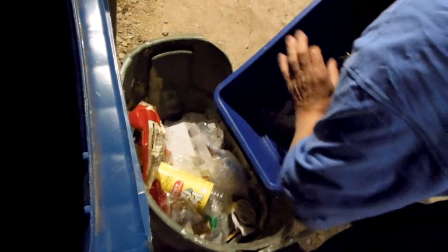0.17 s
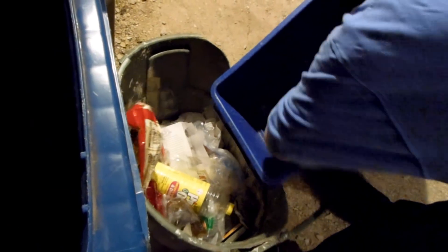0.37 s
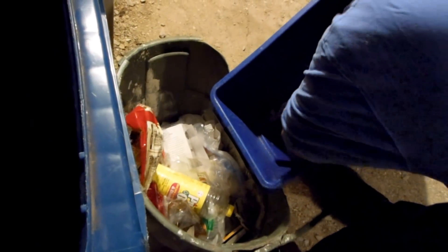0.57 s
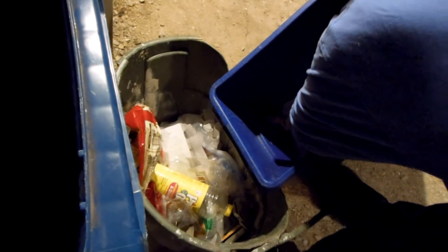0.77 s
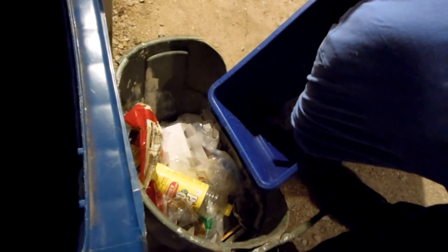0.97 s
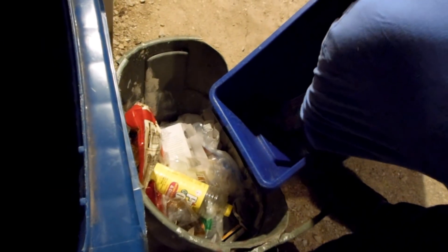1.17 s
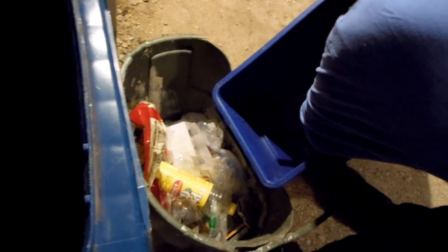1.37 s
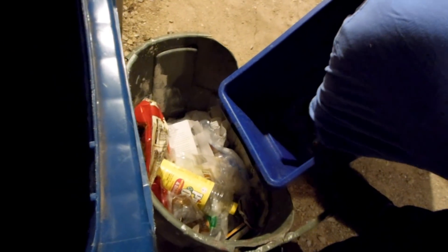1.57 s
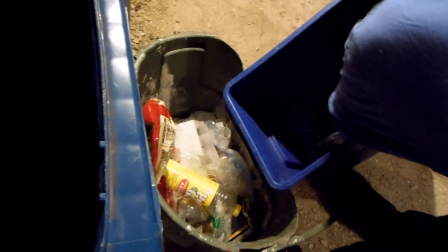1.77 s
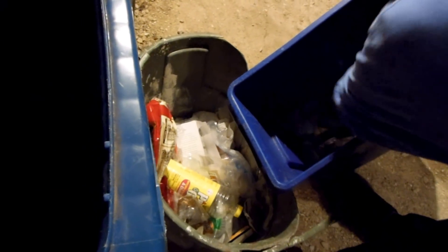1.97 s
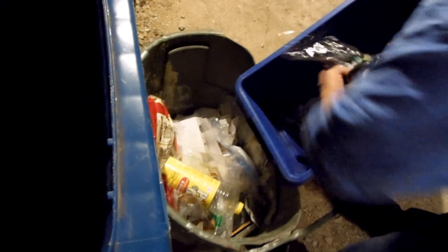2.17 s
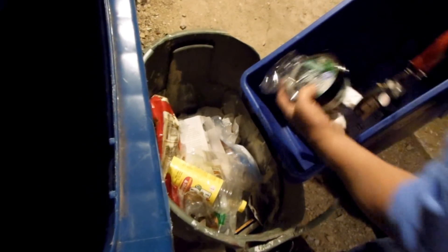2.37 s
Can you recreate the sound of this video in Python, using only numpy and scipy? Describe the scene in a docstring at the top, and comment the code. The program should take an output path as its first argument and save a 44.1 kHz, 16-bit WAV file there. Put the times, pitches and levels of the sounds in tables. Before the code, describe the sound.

Close, booming knocks of a plastic bin on a garbage can, fading into taps and crinkling wrappers.

```python
"""A booming knock, close enough to overload the recorder: outdoors at night, a hollow plastic bin hits a
garbage can while bottles and wrappers slide about in it. Each knock booms in the tub, rings its walls and
cracks; a small metal clasp tinkles. Then foil wrappers rustle and snap near the stereo microphone,
over a distant rumble."""
import sys
import numpy as np
from scipy import signal
from scipy.fft import rfft, irfft, next_fast_len
from scipy.io import wavfile

SR = 44100
rng = np.random.default_rng(int(sys.argv[2]) if len(sys.argv) > 2 else 0)


def waveform_to_disk(signal):
    """Save audio, clipped to [-1, 1], as 16-bit WAV at the path in sys.argv[1]."""
    frames = np.transpose(np.atleast_2d(signal))
    scaled = np.clip(frames, -1, 1) * 32767
    samples = np.round(scaled).astype(np.int16)
    wavfile.write(sys.argv[1], SR, samples)


N = 106854


def from_db(db):
    return 10 ** (np.asarray(db) / 20)


def unit_rms(x):
    return x / np.sqrt(np.mean(x ** 2) + 1e-20)


def at_hz(points, hz):
    point_hz, values = np.transpose(points)
    return np.interp(np.log(hz), np.log(point_hz), values)


def decay(t60, size):
    """Exponential fall from 1, by 60 dB in t60 seconds."""
    return from_db(-60 * np.arange(size) / SR / np.maximum(t60, .003))


def band(x, low_hz, high_hz):
    sos = signal.butter(2, [low_hz, min(high_hz, .45 * SR)], "band", fs=SR, output="sos")
    return signal.sosfilt(sos, x)


def add(out, start_s, sound):
    i = int(start_s * SR)
    out[i:i + len(sound)] += sound[:N - i]


def drift(rate_hz):
    """Smooth random wander of rms 1."""
    step, settle = 40, 2000
    pole = np.exp(-2 * np.pi * step * rate_hz / SR)
    white = rng.standard_normal(N // step + settle + 2)
    slow = signal.lfilter([1], [1, -2 * pole, pole ** 2], white)[settle:]
    return np.interp(np.arange(N) / step, np.arange(len(slow)), unit_rms(slow))


# Diffuse sound at the microphone. Each row: frequency in Hz, left-right correlation.
LIKENESS = [(60, 0.98), (240, 0.97), (920, 0.93), (3620, 0.79), (14200, 0.64)]
def diffuse_noise(spectrum, white, flicker_db):
    """Stereo noise of rms 1 in half-octave bands that flicker partly together, partly alone."""
    out, together = 0, drift(rate_hz=20)
    edges_hz = 20 * 2 ** np.arange(0, 9.6, .5)
    for k, (low, high) in enumerate(zip(edges_hz, edges_hz[1:])):
        centre_hz = np.sqrt(low * high)
        mid, side = band(white[k % 2], low, high)
        alike = at_hz(LIKENESS, centre_hz)
        gain = from_db(at_hz(spectrum, centre_hz) + flicker_db * (together + drift(rate_hz=20)))
        out += gain * (np.sqrt(1 + alike) * mid + np.sqrt(1 - alike) * side * [[1], [-1]])
    return unit_rms(out)


# The night air, far off. Each row: frequency in Hz, relative density in dB.
RUMBLE_SPECTRUM = [(13, -32), (22, -2.5), (81, 2.5), (143, -18), (183, -6.5), (448, -22.5), (621, -15.5),
                   (837, -18.5), (1100, -21), (2000, -25), (14500, -44)]
def distant_rumble():
    """A low, faintly wavering bed of outdoor noise."""
    white = rng.standard_normal((2, 2, N))
    return from_db(-41) * diffuse_noise(RUMBLE_SPECTRUM, white, flicker_db=-.7)


# Wrappers and a sleeve, near the microphone. Each row: time in seconds, level in dB.
RUSTLE_LEVELS = [(0, -44), (.15, -54), (.7, -59), (.77, -51), (.88, -57), (1.1, -57), (1.21, -49),
                 (1.4, -56), (1.56, -55), (1.66, -49), (1.81, -50), (1.88, -45), (1.96, -49), (2.1, -47),
                 (2.17, -41.5), (2.22, -45), (2.26, -40), (2.31, -41), (2.345, -58), (2.42, -55)]
# Their tone colour. Each row: frequency in Hz, relative density in dB.
RUSTLE_SPECTRUM = [(1500, -2.5), (2100, -5), (3400, -2.5), (5400, -7), (7100, 3.5), (9500, -3), (12300, 0),
                   (14500, .5)]
def wrapper_rustle(crinkles_per_s=3000, spread_db=3):
    """Dense crinkles of uneven size on smooth rubbing noise, at equal power."""
    shape = (2, 2, N)
    happens = rng.random(shape) < crinkles_per_s / SR
    sizes = from_db(spread_db * np.minimum(rng.exponential(1, shape), 3))
    crinkles = unit_rms(happens * sizes * rng.choice([-1, 1], shape))
    white = np.sqrt(.5) * (crinkles + rng.standard_normal(shape))
    level_db = np.interp(np.arange(N) / SR, *np.transpose(RUSTLE_LEVELS))
    return from_db(level_db) * diffuse_noise([(700, -30)] + RUSTLE_SPECTRUM, white, flicker_db=.9)


# Wrappers snap and small bottles tap, close by.
# Each row: start in seconds, peak in dB, centre in Hz, width in octaves, t60 in seconds.
SNAPS_AND_TAPS = [(0.9672, -23, 6500, 1.4, 0.034), (0.9705, -10.5, 7100, 1.4, 0.013),
                  (0.9713, -9.5, 2740, 1.1, 0.009), (1.145, -16.5, 5680, 0.33, 0.015),
                  (1.145, -13.5, 9000, 4.5, 0.0072), (1.288, -31.5, 5100, 1.8, 0.04),
                  (1.583, -32.5, 1250, 1.26, .03), (1.625, -31, 4100, 0.76, 0.064),
                  (1.647, -21, 10500, 1.7, 0.043), (1.731, -29.5, 1520, 0.24, 0.031),
                  (1.901, -30.5, 420, 1.75, 0.21), (1.9063, -17.5, 4470, 3.1, 0.032),
                  (2.398, -24.5, 4800, 1.6, 0.046), (2.398, -38.5, 800, 0.23, 0.028)]
def snaps_and_taps(click_strength=.5):
    """A sharp click and a dying noise burst pass through one resonance."""
    out, size = np.zeros(N), SR // 8
    for start_s, peak_db, hz, octaves, t60 in SNAPS_AND_TAPS:
        burst = rng.standard_normal(size) * decay(t60, size)
        burst[0] += click_strength * np.sqrt(SR / hz / octaves)
        snap = band(burst, hz / 2 ** (octaves / 2), hz * 2 ** (octaves / 2))
        add(out, start_s, from_db(peak_db) * snap / np.max(np.abs(snap)))
    return out


# The metal clasp. Each row: pitch in Hz, level in dB, t60 in seconds, family (0 lower, 1 upper).
CLASP_MODES = [(4850, 0, .13, 0), (4890, -6, .1, 0), (5900, -3, .05, 0), (9530, -12, .1, 0),
               (7195, 1, .14, 1), (7250, -5, .09, 1), (10730, -8, .08, 1)]
# Its tinkles, close by. Each row: start in seconds, levels of the lower and upper family in dB.
CLASP_TINKLES = [(.008, -36, -39), (.135, -49, -61), (.293, -55, -26), (.452, -24, -52), (.559, -58, -29.5),
                 (.622, -71, -49)]
def clasp(rattle_db=2.5, rattle_hz=120):
    """Thin metal modes, close pairs beating, their level shaken as the loose parts rattle."""
    out, size = np.zeros(N), SR // 2
    t = np.arange(size) / SR
    for start_s, *family_db in CLASP_TINKLES:
        for hz, db, t60, family in CLASP_MODES:
            ring = np.sin(2 * np.pi * hz * t) * decay(t60, size)
            add(out, start_s, from_db(db + family_db[int(family)]) * ring)
    return out * from_db(rattle_db * drift(rattle_hz))


# The contact on the bin, heard close. Each row: low and high edge in Hz, level in dB,
# t60 in seconds, relative level of a slower tail in dB, its t60 in seconds.
CONTACT_BANDS = [(104.5, 690, -6, 0.17, -8.5, 0.26), (580, 2250, -4.5, 0.047, -8.5, 0.15),
                 (2400, 7200, -1, 0.014, -3, 0.11), (10500, 14200, -4, 0.037, -15.5, 0.13)]
def contact_noises(skirt=1.6):
    """Steady noise for each band, falling twice as steeply a factor of skirt beyond its edges."""
    return [unit_rms(band(band(rng.standard_normal(N + SR // 2), low, high), low / skirt, high * skirt))
            for low, high, *_ in CONTACT_BANDS]


def contact(t, noises, levels_db, stretches, rise_cycles=.23):
    """The crack of a blow: each noise band jumps up, drops fast and leaves a tail."""
    out = 0
    for row, noise, level_db, stretch in zip(CONTACT_BANDS, noises, levels_db, stretches):
        low_hz, _, band_db, t60, tail_db, tail_t60 = row
        rise = (1 - np.exp(-t * low_hz / rise_cycles)) ** 2
        fall = decay(t60 * stretch, len(t)) + from_db(tail_db) * decay(tail_t60 * stretch, len(t))
        out += from_db(level_db + band_db) * noise[:len(t)] * rise * fall
    return out


# The bin's plastic walls. Each row: pitch in Hz, level in dB, t60 in seconds.
WALL_MODES = [(100.3, -6.5, 0.11), (147.9, -13, 0.37), (191.2, -22, 0.38), (244, -12, 0.16),
              (262, -12, 0.23), (341, -15, 0.21), (398, -10.5, 0.12), (441.7, -12.5, .11), (568.4, -6, 0.1),
              (663, -9, 0.13), (776, -13, 0.18), (947, -19.5, 0.15), (1134, -15, 0.12),
              (1400, -17.5, 0.052)]
def wall_ring(t, ring_db, clatter_db, stretch, spot_hz, luck, spread_db=3.5, detune=.014):
    """The walls ring; modes near the struck spot's own pitch sound louder and longer."""
    hz, mode_db, t60 = np.transpose(WALL_MODES)[:, :, None]
    level_luck, pitch_luck = luck
    octaves_below = np.log2(spot_hz / hz)
    near = np.exp(-(octaves_below / .13) ** 2)
    blow_db = at_hz([(300, ring_db), (1200, clatter_db)], hz) + spread_db * level_luck
    spot_db = 11.5 * near + .5 * np.maximum(octaves_below, 0)
    tones = np.sin(2 * np.pi * hz * (1 + detune * pitch_luck) * t)
    rise = 1 - np.exp(-t * hz / .49)   # about half a cycle
    fall = decay(t60 * stretch * (1 + .2 * near), len(t))
    return (from_db(mode_db + blow_db + spot_db) * tones * rise * fall).sum(axis=0)


def tub_boom(t, db, stretch, hz=69.5, t60=.2, rise_s=.0066, stiffening=.03):
    """The hollow tub booms, stiffer and so higher in pitch while it swings wide."""
    swing = from_db(db) * decay(t60 * stretch, len(t)) * (1 - np.exp(-t / rise_s))
    return swing * np.sin(2 * np.pi * hz * np.cumsum(1 + stiffening * swing) / SR)


# The bin hits the can, close to the microphone. Each row: start in seconds, levels of boom, ring,
# clatter, crack and sizzle in dB, length factors of boom, ring and crack, the spot's pitch in Hz.
BIN_KNOCKS = [(0.0, 12, 6, -1, -12, -17, .93, 0.7, 0.92, 417.6),
              (.021, -39, -45, -24, -54, -30, .9, 3.3, 1, 190),
              (0.048, -26, -14.5, -41, -45, -42, .7, 0.66, 1.2, 147),
              (0.1027, -18, -28.5, -25, -35, -35.5, 3.1, 0.71, 0.72, 564),
              (0.138, -11.5, -33.5, -35, -46.5, -56, 2.83, 2.56, .9, 136),
              (0.2907, -21, -4, -5, -16, -8.5, 2.9, 0.9, 0.91, 249.6),
              (.337, -7, -16.5, -19, -43, -39, 0.61, 0.84, 1.6, 351),
              (0.4204, 4.5, 2.5, -7, -28.5, -19, 0.68, 0.52, 1.06, 229),
              (.449, 7.5, -10.5, -4, -19.5, -13, 0.23, 0.66, 0.83, 552),
              (.476, -15, -27, -24.5, -55, -43, 1.3, 0.87, .62, 400),
              (.543, -29, -54, -35, -60, -53, 1.4, 0.53, 0.9, 398),
              (.557, -18, -10.5, -16.5, -25.5, -15.5, 2.4, 1.13, 0.92, 253),
              (.622, -9.5, -23, -29.5, -44, -45, 0.37, 0.6, 0.52, 260),
              (0.652, -40, -21, -62, -71, -69, 0.71, 0.32, .82, 335),
              (.734, -48, -8, -13, -42, -40, .82, 0.45, 2.4, 854),
              (.75, -44, -17, -35, -61, -60, .8, 0.99, 1, 240),
              (.782, -13, -23.5, -27.5, -32, -31.5, 0.35, 0.83, 0.61, 153),
              (.824, -23, -11.5, -24, -64, -37.5, 1.3, 0.47, .9, 360),
              (.909, -8.5, -13.5, -23, -49, -44.5, 0.45, 0.75, 2, 164),
              (0.9778, -10, -20.5, -26.5, -31.5, -37, 0.25, 1.1, 0.95, 401),
              (1.038, -15, -22.5, -37, -62, -47, 0.81, 0.81, 0.64, 409),
              (1.079, -24.5, -23, -37, -68, -61, 1.3, 0.7, .62, 400),
              (1.11, -24, -26, -43.5, -70, -69, 1.4, 1.02, .9, 157.5),
              (1.199, -32, -43, -39.5, -41, -46, .83, 2, 3.2, 530),
              (1.236, -31, -18.5, -18.5, -46, -45, 0.92, 1.01, 2, 446),
              (1.322, -41, -31.5, -37, -52, -43, 1, 0.83, 1, 433),
              (1.36, -52, -40.5, -38.5, -63, -53, 1.1, 1.17, 0.97, 266)]
def bin_knocks():
    """Each blow sets off the tub's boom, the wall modes and a noisy contact."""
    out, t = np.zeros(N), np.arange(SR // 2) / SR
    noises = np.array(contact_noises())
    for start_s, boom_db, *levels_db, boom_stretch, ring_stretch, crack_stretch, spot_hz in BIN_KNOCKS:
        ring_db, clatter_db = levels_db[:2]
        luck = rng.standard_normal((2, len(WALL_MODES), 1))
        boom = tub_boom(t, boom_db, boom_stretch)
        ring = wall_ring(t, ring_db, clatter_db, ring_stretch, spot_hz, luck)
        stretches = [ring_stretch, ring_stretch, crack_stretch, crack_stretch]
        crack = contact(t, noises[:, int(start_s * SR):], levels_db, stretches)
        add(out, start_s, boom + ring + crack)
    return out


# Near sounds at the microphone. Each row: frequency in Hz, lead of the left port in radians.
PORT_LEAD = [(500, 0.042), (2200, 0.77), (4800, 1.67), (8000, 1.55), (14000, 1)]
# Each row: frequency in Hz, left level minus right in dB.
PORT_BALANCE = [(60, 2), (370, 1.5), (680, 1.1), (2290, -0.5), (4210, 1.5), (7730, 1.5), (14200, -2.5)]
def microphone_ports(near, echo_db=-9, echo_t60=.015):
    """Two ports hear near sounds with their own phase and level, plus a short scatter of echoes."""
    size = next_fast_len(N + SR // 2)
    hz = np.maximum(np.arange(size // 2 + 1) * SR / size, 1)
    left = np.sqrt(from_db(at_hz(PORT_BALANCE, hz))) * np.exp(.5j * at_hz(PORT_LEAD, hz))
    echoes = band(rng.standard_normal((2, SR // 4)) * decay(echo_t60, SR // 4), 2160, 14500)
    echoes *= from_db(echo_db) / np.sqrt(np.sum(echoes ** 2, axis=1, keepdims=True))
    response = np.array([left, 1 / left]) + rfft(echoes, size)
    return irfft(rfft(near, size) * response, size)[:, :N]


def scene():
    """The bin and its contents up close, the night far behind."""
    rumble = distant_rumble()
    near = bin_knocks() + clasp() + snaps_and_taps()
    return rumble + microphone_ports(near) + wrapper_rustle()


def record(dry, ceiling=.98, knee=4, cutoff_hz=14350):
    """The microphone lifts the top treble; the recorder flattens loud peaks and cuts off the highs."""
    bright = dry + .36 * band(dry, 11700, 13900)
    overloaded = bright / (1 + np.abs(bright / ceiling) ** knee) ** (1 / knee)
    lowpass = signal.ellip(14, .5, 90, cutoff_hz, fs=SR, output="sos")
    return signal.sosfilt(lowpass, overloaded)


dry = scene()
out = record(dry)
waveform_to_disk(out)
```